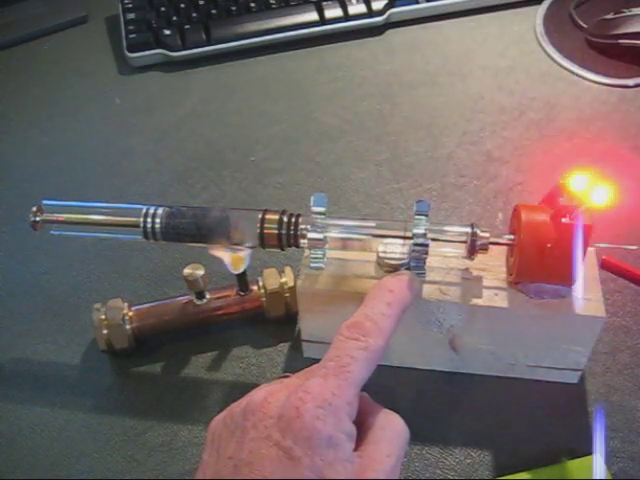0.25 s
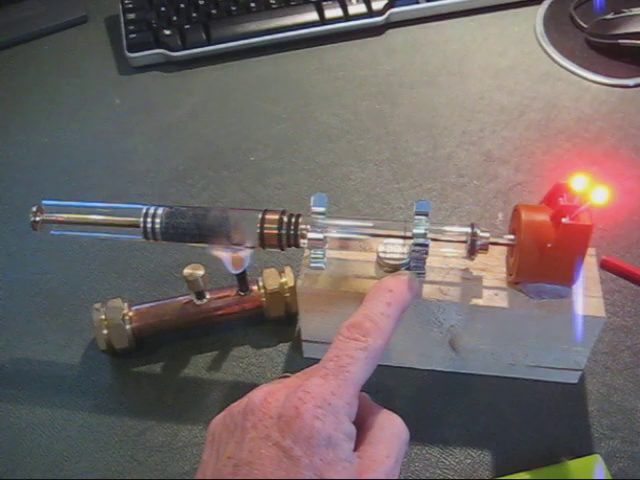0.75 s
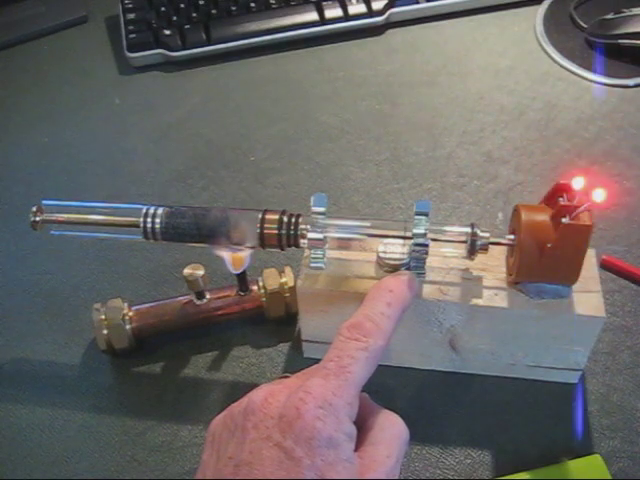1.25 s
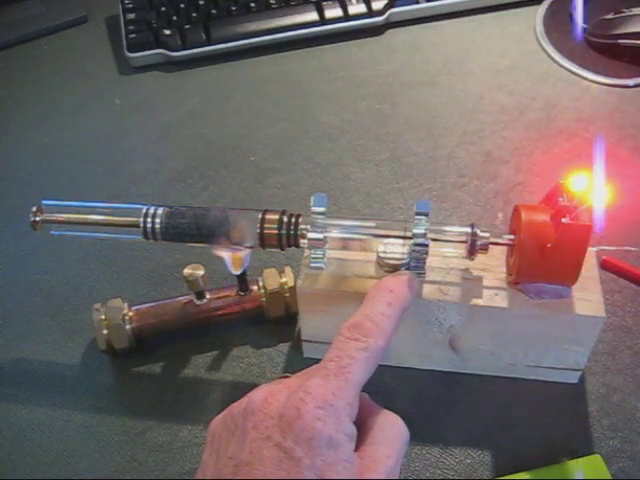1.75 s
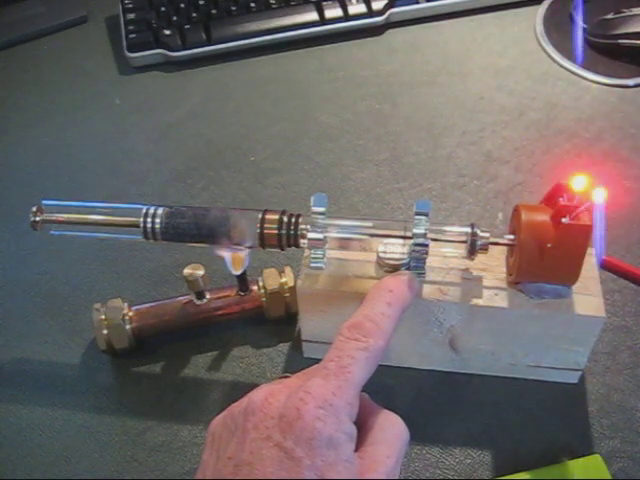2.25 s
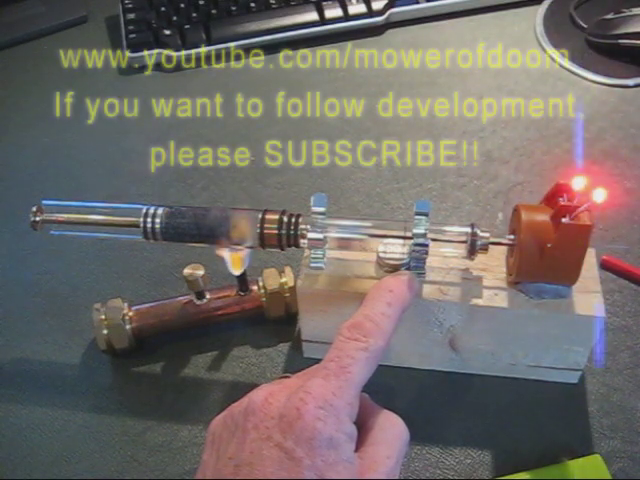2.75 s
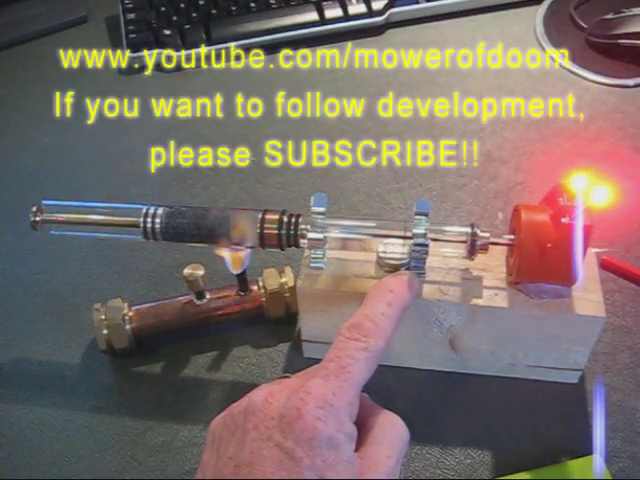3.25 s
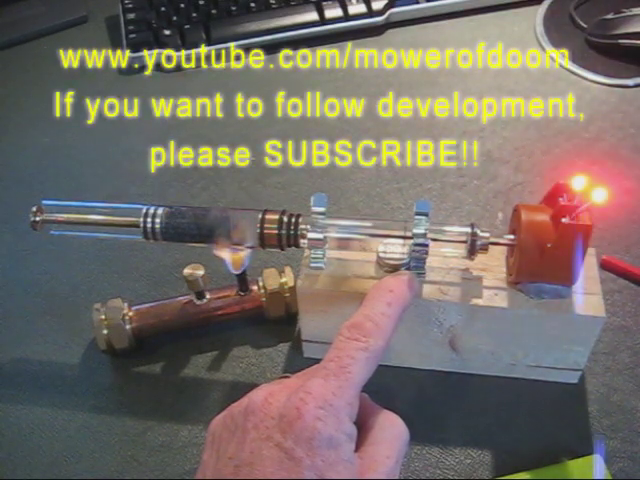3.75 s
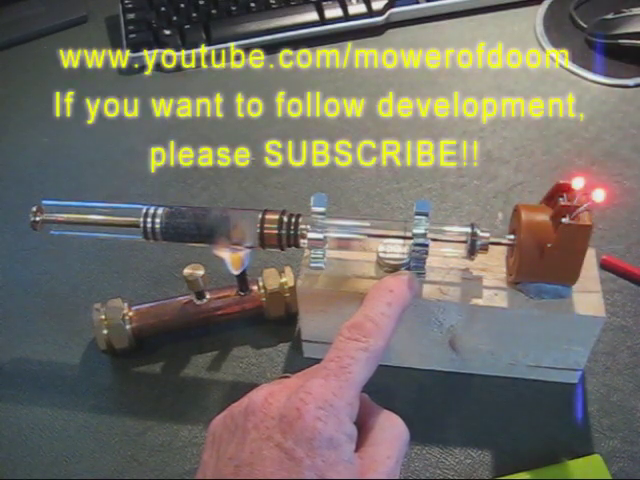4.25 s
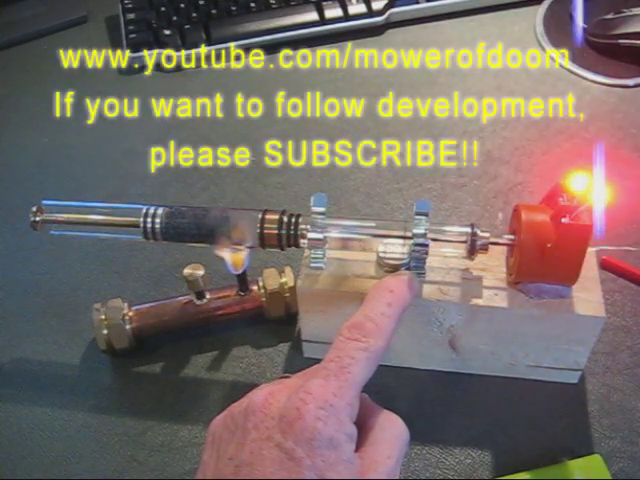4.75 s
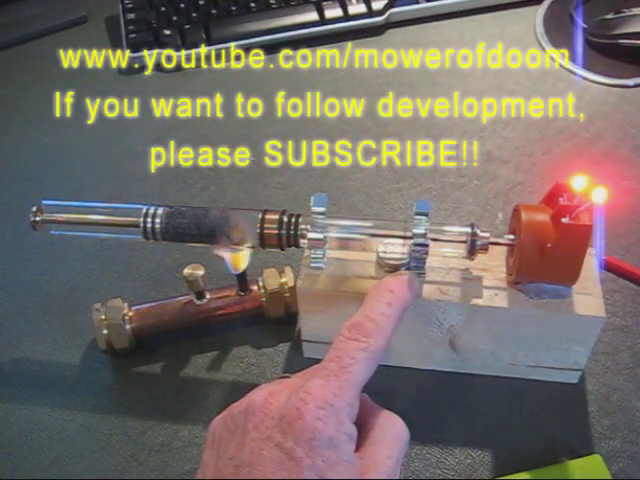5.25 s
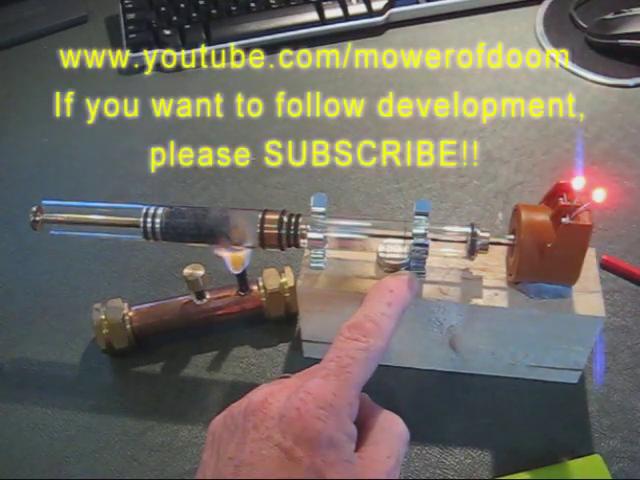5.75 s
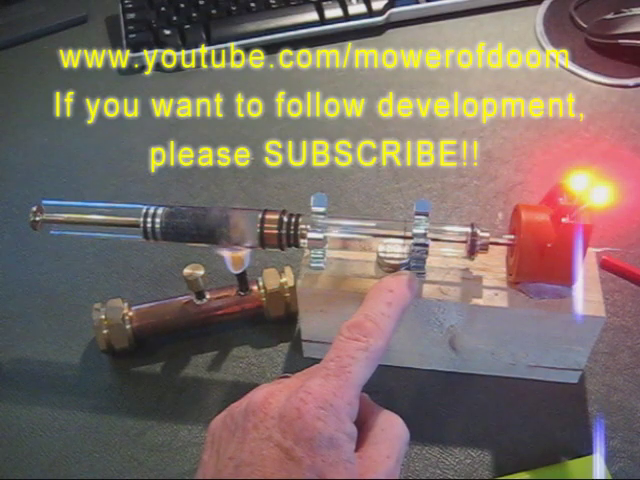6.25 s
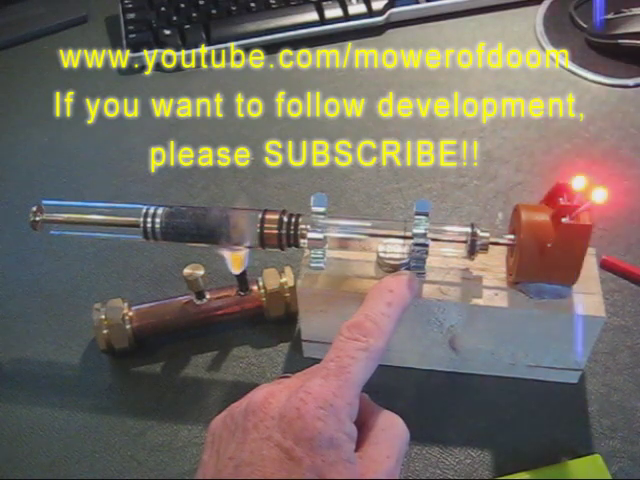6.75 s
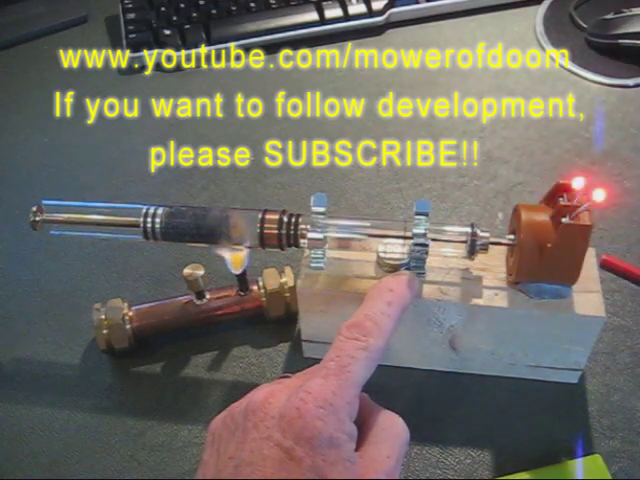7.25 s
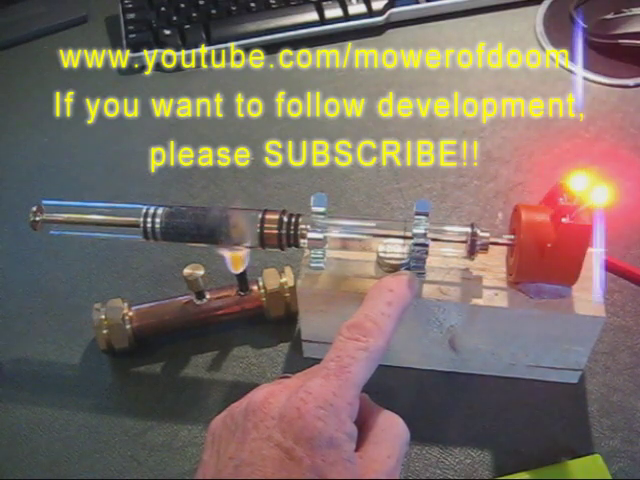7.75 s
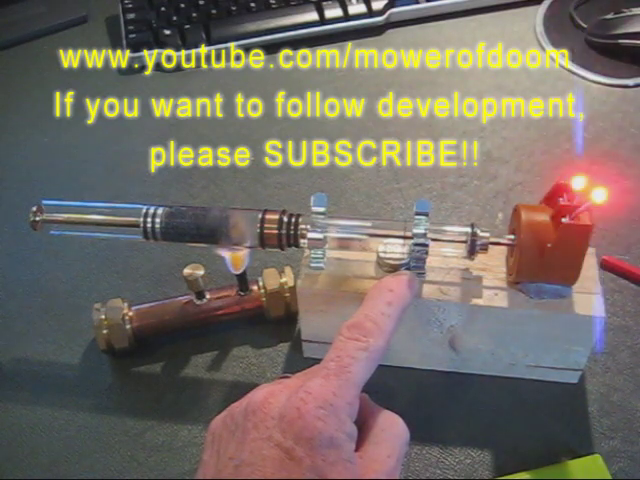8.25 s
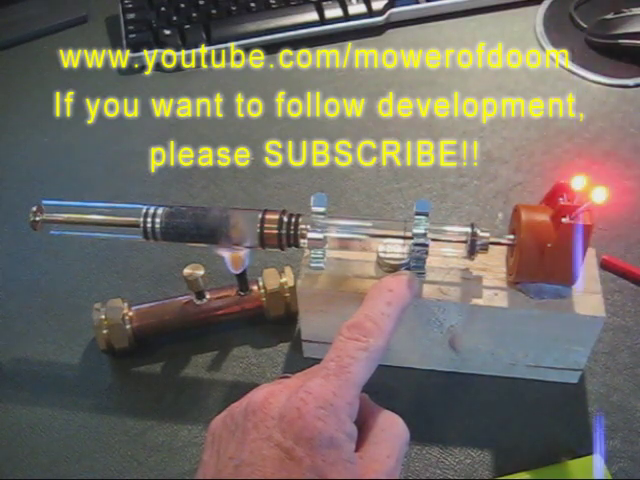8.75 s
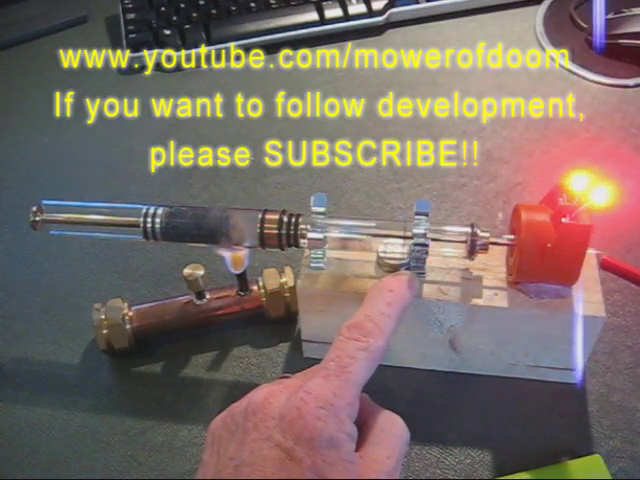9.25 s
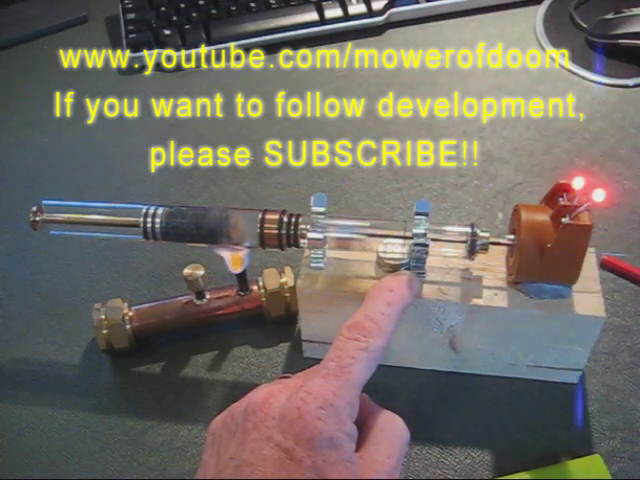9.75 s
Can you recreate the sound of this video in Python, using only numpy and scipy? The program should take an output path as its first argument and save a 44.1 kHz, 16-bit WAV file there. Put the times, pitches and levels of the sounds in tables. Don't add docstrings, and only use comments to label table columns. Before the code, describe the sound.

Steady close metallic buzzing rattle from a tiny desktop engine, pulsing gently in speed and tone, with a faint piston squeal and room hiss.

```python
import sys
import numpy as np
from scipy import signal
from scipy.fft import rfft, irfft
from scipy.io import wavfile
from scipy.ndimage import uniform_filter1d

SR = 44100
rng = np.random.default_rng(int(sys.argv[2]) if len(sys.argv) > 2 else 0)


def linear_from_db(decibels):
    return 10 ** (np.asarray(decibels, float) / 20)


def wrap_up_sound(samples):
    columns = np.atleast_2d(samples).T
    tamed = np.clip(columns, -1, 1)
    steps = np.round(tamed * 32767).astype(np.int16)
    wavfile.write(sys.argv[1], SR, steps)


N = 440559

# (starts to tighten [s], half collapsed [s], speed gained [strokes/s])
SURGES = [(-.147, .807, .4749), (1.405, 2.274, .5012), (2.821, 3.716, .4816), (4.408, 5.272, .421),
          (5.875, 6.653, .4477), (7.414, 8.184, .3976), (8.747, 9.559, .4589)]
# (surge [dB], lull after it [dB])
VIGOUR = [(-.3, -1), (-.1, -0.76), (.1, -1.75), (-.1, -1), (.2, -1.5), (.6, -0.5), (.7, -2.5)]
# (time from half collapsed [s], width [s], level [dB])
JOLTS = [
    (-.16, 0.12, -4.5),
    (0.086, 0.046, 3.5),
]
TIGHTEN_S, COLLAPSE_S, LULL_SLACK_MS = .132, .069, 3.48
LULL_RATE, SPEED_LAG_S, EARLY_DEFICIT, FIRST_STROKE = 29.4265, .1541, .1908, .2664
EARLY_SLACK_MS, EARLY_SLACK_S = 1.16, 0.11
TIGHT_GAP_MS, LOOSEN_MS = 1.09, .026
RELEASE_MS = 13.2
SQUEAL_HZ, SQUEAL_SAG_HZ_PER_MS = 1785.3, 50
WANDER_DB, WANDER_HZ = 1.17, 7
SHEEN_DB = -11
HISS_DB = -41.5
SIDE_DB, SIDE_SHARE = -61, .05
KEPT_HZ, KEPT_SPREAD_HZ = 13800, 650

# (pitch [Hz], width [Hz], level [dB])
TABLETOP = [(100.5, 19, -15), (215.7, 21.4, -7.5), (266.3, 9.5, -0.5), (323.9, 3.4, 10), (417.3, 6.7, -6)]
BLOCK = [(732.5, 173, 31), (1020, 510, -34)]
GUIDE = [(871.5, 9.8, -5), (934, 36, -1.5), (1072, 125, -5), (1174, 66, -3), (1260.5, 21, -2.5),
         (1273, 59, -10), (1974, 52, -11), (3790, 60, -10)]
KNOCK = [(1000, 435, -1), (2260, 1500, -8), (5130, 4500, -12)]
COLLAR = [(5066, 62, 0.1)]
SLEEVE = [(3040, 70, -1.5), (3180, 80, 0.1), (4570, 70, 0.2)]
SHAFT = [(2700, 110, -5), (2815, 75, 0.1)]
TUBE = [(1570, 59, -1.9), (1651.5, 69, 1.6), (1776, 79, -1.1)]
ROD = [(1303, 230, -4), (1600, 110, -1), (2110, 500, -9), (2520, 300, -7), (3010, 70, -8), (3270, 120, -8),
       (3560, 400, -8), (3900, 200, -9), (4430, 170, -3)]
RATTLE = [(4350, 400, -1.5), (4910, 270, -3), (5710, 330, 1.5), (6470, 270, 4), (7210, 830, -1.5)]
SHEEN = [(9143, 246, -2.5), (10970, 720, -10), (13030, 1500, -14)]

# (tick [dB], hardest blow slips [ms per ms of slack], rise [ms], fall [ms],
# fall growth [per ms of slack], size scatter [dB], scrape [dB], scrape length [ms], return stroke [dB],
# added rise [ms per ms of slack], tick gain [dB per ms of slack], return-stroke fade [dB per blow])
TABLETOP_FEELS = (-3, .2, 1.5, 1.5, .1, 1, -25, 1, -40, .5, 0, 0)
BLOCK_FEELS = (-48, 0.66, 2.5, 2.1, 0.7, -0.2, -29, 2, -27.5, 0.5, -5, -0.5)
GUIDE_FEELS = (-3, 1, 1.1, 0.84, -0.1, 1.2, -15, 1, -30, 3.5, -1.5, -0.5)
KNOCK_FEELS = (-30, 0.23, 0.62, 0.5, 0.05, 1.2, -25, 1, -27, 0.1, -4, 2)
COLLAR_FEELS = (-8, 0.3, 3, 2, 0, 3, -7, 2, -20, 1, 1, 4)
SLEEVE_FEELS = (-3, 0.6, 2.2, 3, 0.25, 2.5, -8, 2.5, -25, 0.6, 0.1, 4)
SHAFT_FEELS = (-10, 0.3, 0.35, 0.8, 0.3, 1.5, -14, 1.5, -40, 0.05, 4.2, 4)
TUBE_FEELS = (-32, -0.1, 0.9, 1.7, 0.4, 2, -11, 2, -33, 0.5, -3, 3)
ROD_FEELS = (-5, 0.9, 0.9, 1.16, 0.5, 1, -9, 0.5, -45, 2.2, 0.1, 6)
RATTLE_FEELS = (-5.5, 0.17, 2.2, 1.35, 0.45, 3, 0, 2.5, -15, 0.2, -1.5, 4)
SHEEN_FEELS = (-3.5, 0.3, 1, 1.5, 1, 2.5, 1, 1, -13.5, 2, 0.7, 3)

# (tight [dB], slack [dB per ms], speeding up [dB per unit], boost where the chatter
# suits it [dB], slack that suits it [ms], width of that slack [ms], share of vigour [ratio])
BLOCK_LAW = (-30.5, -0.32, -2.5, 3, -4, -0.5, 0.64)
GUIDE_LAW = (-39.5, -1.04, 4, 2.5, 3, 0, 1.05)
KNOCK_LAW = (-37, -1.5, 0.3, 0.5, 3.5, -1.5, 0.7)
COLLAR_LAW = (-51.5, -0.7, 2, 8, 1.8, 1.4, 0.2)
SLEEVE_LAW = (-47, 1.1, 0.8, 0.5, 2, 1.2, 0.9)
SHAFT_LAW = (-33.5, -4, -1.5, 3, 1.5, 1.3, 0.4)
TUBE_LAW = (-40.5, 0.6, 0.8, 9.5, 2, 1.15, 2)
ROD_LAW = (-36.5, -3, 1.2, 1.5, 2.5, 1.05, 0.3)
RATTLE_LAW = (-35.5, -1.9, 1.8, 1.1, 3, -3, 0.93)

# (multiple of the stroke rate [ratio], level [dB])
PUMP = [(2, -74), (3, -90), (4, -69.5), (6, -77)]
# (pitch [Hz], level [dB per Hz])
HISS = [(20, -12), (60, -11), (200, -1.5), (400, -3), (800, 3), (1600, 1.5), (3000, -6), (6500, -8),
        (9000, -13), (13500, -23.5), (14500, -29), (15600, -42)]


def level(x, db):
    return x * linear_from_db(db) / np.sqrt(np.mean(x ** 2))


def ring(x, modes, turn):
    out = 0
    for k, (hz, width, db) in enumerate(modes):
        r = np.exp(-np.pi * width / SR)
        w = 2 * np.pi * hz / SR
        tone = signal.lfilter([1, 0, -1], [1, -2 * r * np.cos(w), r * r], x)
        out = out + turn ** k * linear_from_db(db) * (1 - r * r) * tone
    return out


def clicks(seconds, size, count=6):
    place = seconds.ravel() * SR + SR
    index = place.astype(int)[:, None] + np.arange(-count, count + 1)
    offset = index - place[:, None]
    taps = size.ravel()[:, None] * np.sinc(offset) * np.cos(np.pi * offset / (2 * count + 2)) ** 2
    return np.bincount(index.ravel(), taps.ravel(), N + 2 * SR)[SR:SR + N]


def surging():
    t = np.arange(-1000, 1000 * N // SR + 100) / 1000
    start, end, gain = np.transpose(SURGES)[:, :, None]
    fallen = 1 / (1 + np.exp((end - t) / COLLAPSE_S))
    grip = (1 - np.exp(-np.maximum(t - start, 0) / TIGHTEN_S)) * (1 - fallen)
    grip = uniform_filter1d(grip, size=120)
    tight = grip.sum(axis=0)
    early = EARLY_SLACK_MS * np.exp(-(t / EARLY_SLACK_S) ** 2)
    slack = LULL_SLACK_MS * (1 - tight) + early

    keep = np.exp(-1 / (1000 * SPEED_LAG_S))
    drive = np.sum(gain * grip, axis=0)
    speed = signal.lfilter([1 - keep], [1, -keep], drive)
    speed = speed - EARLY_DEFICIT * np.exp(-np.maximum(t, 0) / SPEED_LAG_S)
    speeding = (drive - speed) / gain.mean()
    number = np.cumsum(LULL_RATE + speed) / 1000
    number = number - np.interp(0, t, number) + FIRST_STROKE

    surge_db, lull_db = np.transpose(VIGOUR)
    last = np.maximum(np.searchsorted((start + end)[:, 0] / 2, t) - 1, 0)
    vigour = surge_db @ grip + (1 - tight) * lull_db[last]
    return t, slack, speeding, vigour, number


def bounces(controls, free_ms=1.57, catch_ms=.16, tight_ms=1.16, sag=.004, count=13):
    t, slack_ms, _, _, number = controls
    stroke = np.arange(0, np.interp(N / SR, t, number))
    tick = np.interp(stroke, number, t)[:, None]
    slack = np.interp(tick, t, slack_ms)
    chance = rng.standard_normal((len(stroke), count + 1))
    k = np.arange(count)
    gap = (TIGHT_GAP_MS + LOOSEN_MS * slack ** 2) * (1 + sag * (k - 5) ** 2 * (k > 5))
    early_gap = np.where(k < 4, free_ms * (k > 0), gap)
    gap = np.where(k == 4, tight_ms + catch_ms * slack, early_gap)
    ms = np.cumsum(gap + 0.017 * chance[:, :-1], axis=1)
    return tick + (ms + .04 * chance[:, -1:]) / 1000, ms, slack


def squeal(timing, count=24):
    seconds, _, slack = timing
    chance = rng.standard_normal((len(slack), count))
    slip_ms = 1000 / (SQUEAL_HZ - SQUEAL_SAG_HZ_PER_MS * slack)
    ms = np.cumsum(slip_ms + .012 * chance, axis=1)
    return seconds[:, :1] + ms / 1000, ms, slack


def blows(timing, feels, hard_ms=4.75, back_ms=16.5, back_gap_ms=1.12, count=1):
    seconds, ms, slack = timing
    (tick_db, follow, rise_ms, fall_ms, growth, scatter_db, scrape_db, scrape_ms,
     back_db, slowing, tick_gain, back_fade) = feels
    late = ms - hard_ms - follow * slack
    rising = late / (rise_ms + slowing * slack)
    falling = -late / (fall_ms * (1 + growth * slack))
    size = np.exp(np.where(late < 0, rising, falling)) * (ms < RELEASE_MS)
    size[:, :count] += linear_from_db(tick_db + tick_gain * slack)
    train = clicks(seconds, size * linear_from_db(scatter_db * rng.standard_normal(size.shape)))

    back = seconds[:, :1] + (back_ms + back_gap_ms * np.arange(14)) / 1000
    back_level = back_db - back_fade * np.arange(14) + 1.45 * slack
    train = train + clicks(back, linear_from_db(back_level + 2 * rng.standard_normal(back.shape)))

    keep = np.exp(-1000 / (scrape_ms * SR))
    scrape = signal.lfilter([1], [1, -keep], np.abs(train)) * rng.standard_normal(N)
    return level(train, 0) + level(scrape, scrape_db)


def struck_part(modes, feels, timing, turn=-1, top=1.22, ticks=1):
    sound = ring(blows(timing, feels, count=ticks), modes, turn)
    sound = signal.sosfiltfilt(signal.butter(3, top * modes[-1][0], fs=SR, output="sos"), sound)
    power = uniform_filter1d(uniform_filter1d(sound ** 2, size=4455), size=2970)
    return sound / np.sqrt(power)


def loudness(law, controls):
    _, slack, speeding, vigour, _ = controls
    tight_db, per_ms, per_push, suit_db, suit_ms, width_ms, share = law
    suits = suit_db * np.exp(-((slack - suit_ms) / width_ms) ** 2)
    return tight_db + per_ms * slack + per_push * speeding + suits + share * vigour


def jolts(t):
    since = t - np.array(SURGES)[:, 1:2]
    return sum(db * np.exp(-((since - at) / width) ** 2).sum(axis=0) for at, width, db in JOLTS)


def wander(t):
    levels = rng.standard_normal(200)
    return WANDER_DB * np.interp((t - t[0]) * WANDER_HZ, np.arange(len(levels)), levels)


def desk(x, t60_s=.11, delay_ms=6):
    t = np.arange(SR // 5) / SR
    tail = rng.standard_normal(len(t)) * 10 ** (-3 * t / t60_s) * (t > delay_ms / 1000)
    return signal.fftconvolve(x, tail / np.sqrt(np.sum(tail ** 2)))[:N]


def engine(controls):
    t = controls[0]
    timing = bounces(controls)
    block_db = loudness(BLOCK_LAW, controls)
    rattle_db = loudness(RATTLE_LAW, controls) + jolts(t)
    tabletop_db = 0.68 * rattle_db + 0.35 * block_db - 17
    tube = struck_part(TUBE, TUBE_FEELS, squeal(timing), turn=1, top=1.07)
    parts = [
        (struck_part(TABLETOP, TABLETOP_FEELS, timing), tabletop_db + wander(t)),
        (struck_part(BLOCK, BLOCK_FEELS, timing), block_db),
        (struck_part(GUIDE, GUIDE_FEELS, timing), loudness(GUIDE_LAW, controls) + wander(t)),
        (struck_part(KNOCK, KNOCK_FEELS, timing), loudness(KNOCK_LAW, controls) + wander(t)),
        (struck_part(COLLAR, COLLAR_FEELS, timing), loudness(COLLAR_LAW, controls) + wander(t)),
        (struck_part(SLEEVE, SLEEVE_FEELS, timing), loudness(SLEEVE_LAW, controls) + wander(t)),
        (struck_part(SHAFT, SHAFT_FEELS, timing), loudness(SHAFT_LAW, controls) + wander(t)),
        (tube, loudness(TUBE_LAW, controls) + wander(t)),
        (struck_part(ROD, ROD_FEELS, timing), loudness(ROD_LAW, controls) + wander(t)),
        (struck_part(RATTLE, RATTLE_FEELS, timing), rattle_db + wander(t)),
        (struck_part(SHEEN, SHEEN_FEELS, timing, ticks=2), rattle_db + SHEEN_DB + wander(t)),
    ]
    out = 0
    for steady, db in parts:
        out = out + steady * linear_from_db(np.interp(np.arange(N) / SR, t, db))
    to_desk = signal.lfilter([.2], [1, -.8], out) + linear_from_db(-11) * out
    return linear_from_db(1.11) * out + linear_from_db(-12.5) * desk(to_desk)


def pump(controls):
    turn = 2 * np.pi * np.interp(np.arange(N) / SR, controls[0], controls[-1])
    return sum(linear_from_db(db) * np.sqrt(2) * np.sin(round(k) * turn) for k, db in PUMP)


def room_hiss():
    hz, db = np.transpose(HISS)
    bins = np.arange(1, N // 2 + 2) * SR / N
    colour = linear_from_db(np.interp(np.log(bins), np.log(hz), db))
    return level(irfft(rfft(rng.standard_normal(N)) * colour, N), HISS_DB)


def parting(mid, count=24):
    frames = signal.stft(mid, nperseg=2048)[2]
    on = rng.random((len(frames) // count + 1, frames.shape[1])) < SIDE_SHARE
    tilt = (np.arange(len(frames))[:, None] / 300 + .03) ** 1.1
    on = np.repeat(on, count, axis=0)[:len(frames)] * tilt
    turned = np.exp(2j * np.pi * rng.random(frames.shape))
    return signal.istft(frames * on * turned, nperseg=2048)[1][:N]


def scene():
    controls = surging()
    mid = engine(controls) + pump(controls) + room_hiss()
    return mid + level(parting(mid), SIDE_DB) * np.array([[1], [-1]])


def ragged_top(x):
    hz, _, frames = signal.stft(x, SR, nperseg=1024)
    count = frames.shape[-1]
    edge = np.repeat(KEPT_HZ + KEPT_SPREAD_HZ * rng.exponential(size=count), 2)[:count]
    return signal.istft(frames * (hz[:, None] < edge), SR, nperseg=1024)[1][:, :N]


def top_cut(x):
    return signal.sosfilt(signal.butter(12, 15700, fs=SR, output="sos"), x)


def record(dry):
    dull = signal.sosfilt(signal.butter(6, 15000, fs=SR, output="sos"), dry)
    return top_cut(ragged_top(dull))


dry = scene()
out = record(dry)
wrap_up_sound(out)
```